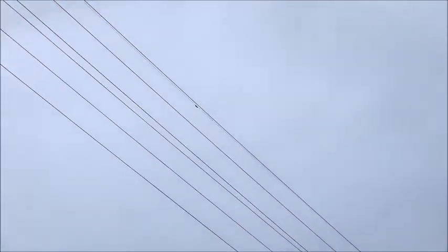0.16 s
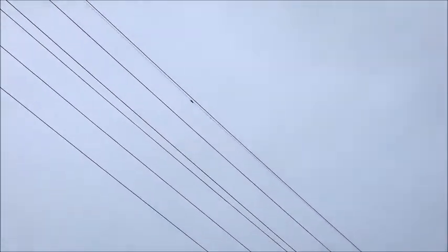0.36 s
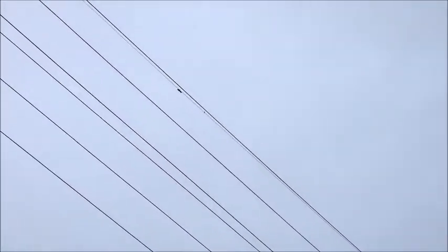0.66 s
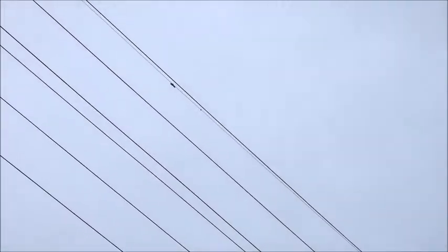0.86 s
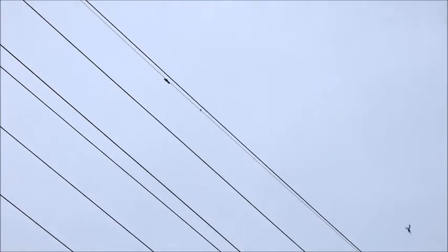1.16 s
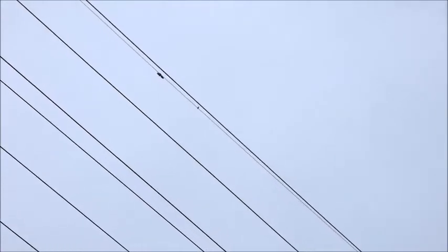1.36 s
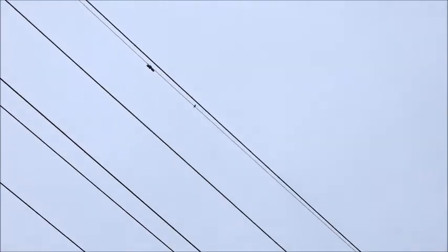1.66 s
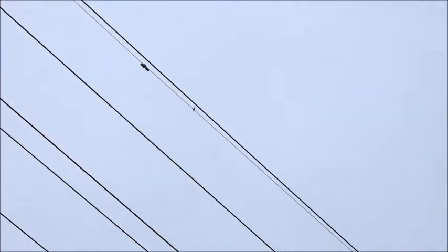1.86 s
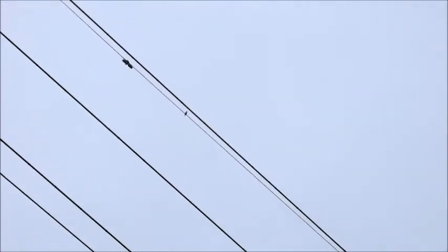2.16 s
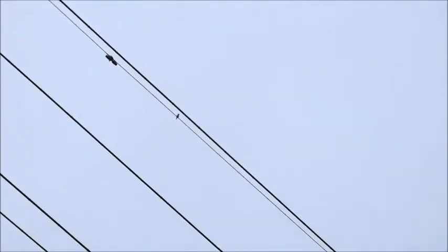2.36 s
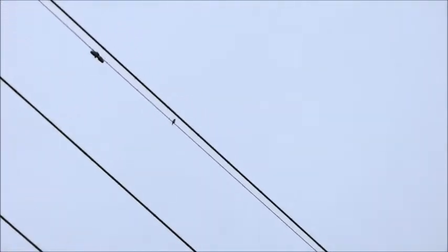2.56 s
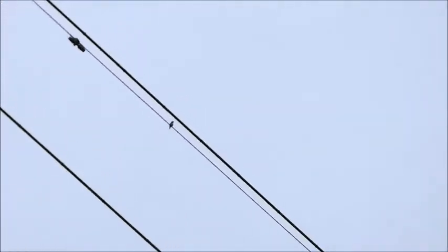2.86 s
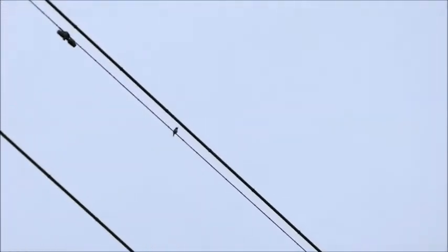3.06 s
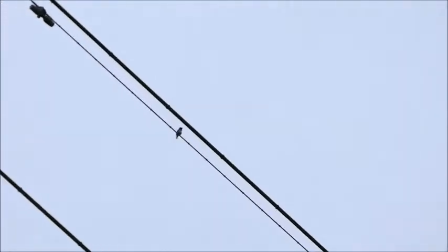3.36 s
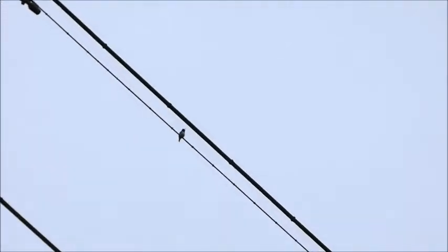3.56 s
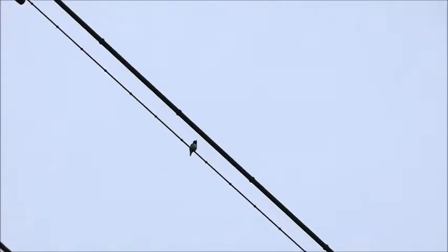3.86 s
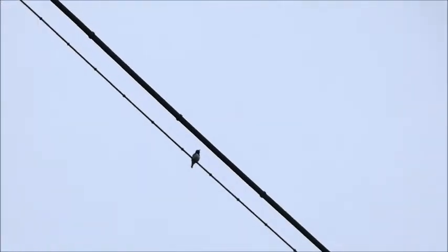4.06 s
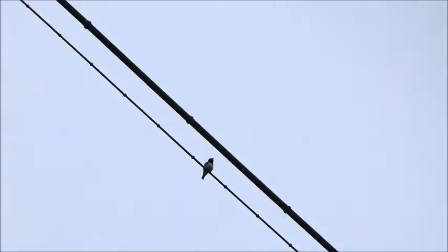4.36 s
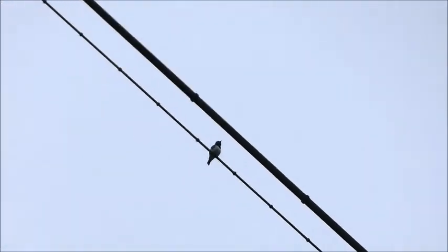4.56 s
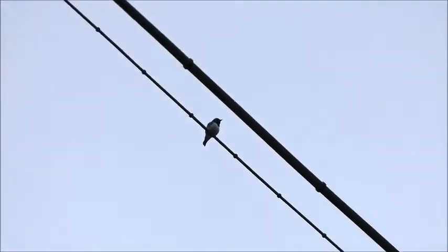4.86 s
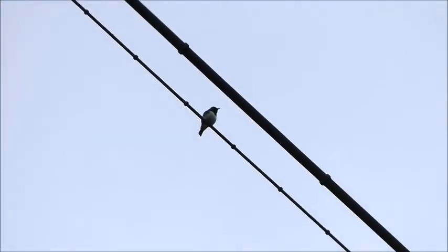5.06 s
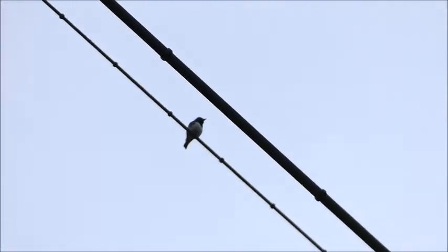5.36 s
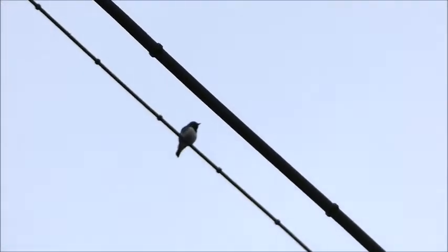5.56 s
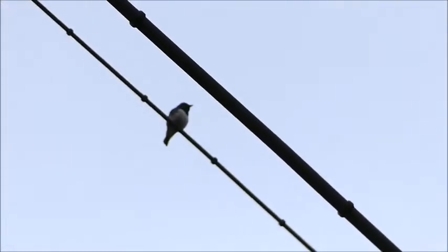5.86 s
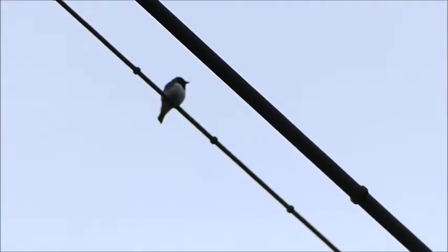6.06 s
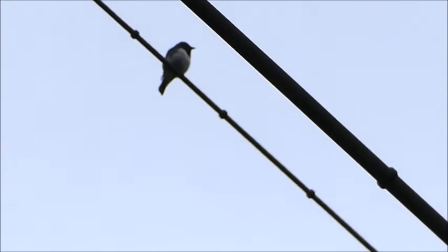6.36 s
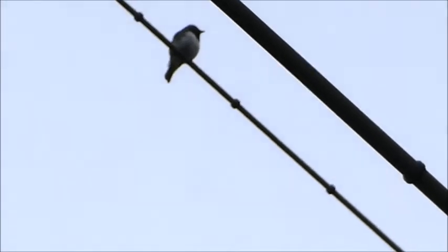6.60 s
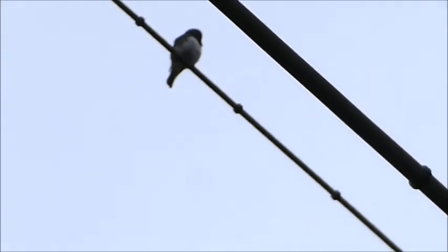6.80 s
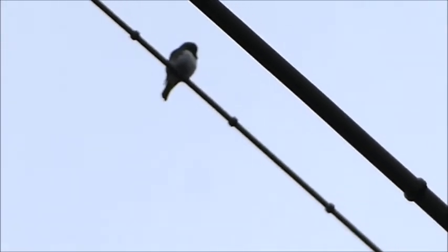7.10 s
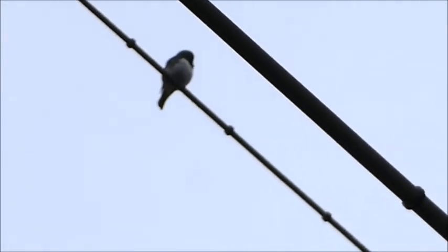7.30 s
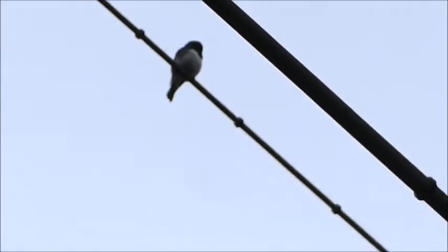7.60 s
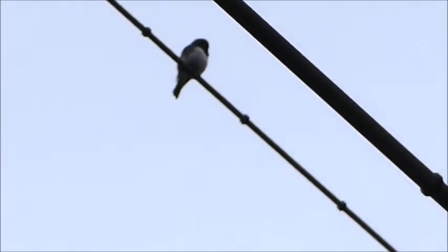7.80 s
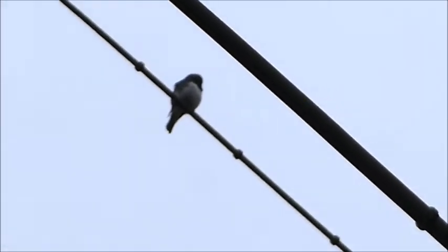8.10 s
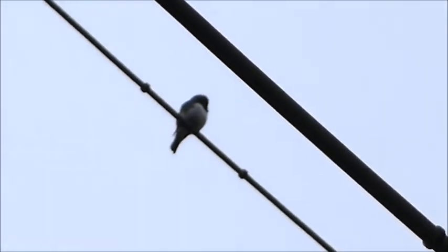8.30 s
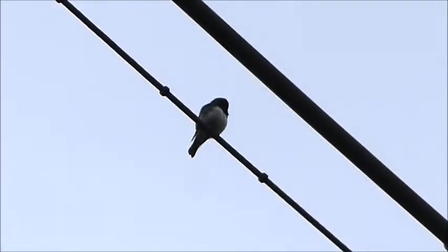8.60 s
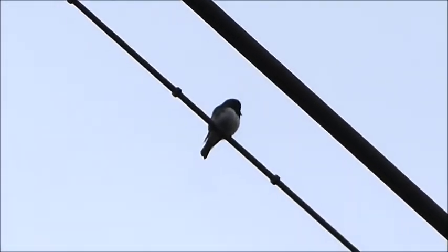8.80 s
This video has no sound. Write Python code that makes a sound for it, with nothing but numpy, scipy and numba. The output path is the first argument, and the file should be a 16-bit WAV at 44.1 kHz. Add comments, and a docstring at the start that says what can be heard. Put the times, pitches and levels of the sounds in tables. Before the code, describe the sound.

A songbird whistles gliding notes over an outdoor wash of leaves and water, then the background shifts and a second bird flutes before a sharp click.

```python
"""Among trees and slopes songbirds whistle, as gliding near sines whose notes echo on in fading noise tails.
A wash of leaves, water and far birds is shaped noise whose stereo image closes towards the centre; a quick
crossfade at 5.4 s brings in a second, nearly mono outdoor wash, which then swells slowly. Water gurgles as
rising bubble rings, dry ticks are noise bursts, and a button on a camera body rings its plastic modes as
contacts strike; a gain control ducks after loud peaks."""
import sys
import numpy as np
from scipy import signal
from scipy.fft import rfft, irfft, next_fast_len
from scipy.io import wavfile
from scipy.ndimage import uniform_filter1d
from numba import njit

SR = 44100
rng = np.random.default_rng(int(sys.argv[2]) if len(sys.argv) > 2 else 0)


def log_audio(samples):
    """Write samples as a 16-bit WAV file to the path given in sys.argv[1]."""
    # one column per channel
    frames = np.atleast_2d(samples).T
    # limit to full scale, then quantise
    limited = np.clip(frames, -1, 1)
    pcm = np.round(limited * 32767).astype(np.int16)
    wavfile.write(sys.argv[1], SR, pcm)


def ratio_of_db(decibels):
    """Turn decibels (scalar or array-like) into linear amplitude factors; 0 dB maps to 1."""
    return 10 ** (np.asarray(decibels, float) / 20)


N = 394254
T = np.arange(N) / SR


def colour(points):
    """Spectral shaping: white noise is weighted by (hz, relative density in dB) points and set to rms 1."""
    hz, db = np.transpose(points)
    size = next_fast_len(N)
    f = np.arange(size // 2 + 1) * SR / size + 1
    spectrum = rfft(rng.standard_normal(size))
    weight = ratio_of_db(np.interp(np.log(f), np.log(hz), db))
    x = irfft(spectrum * weight, size)[:N]
    return x / x.std()


def walk(rate_hz):
    """Band-limited fluctuation: random levels are held 1 / rate_hz and slewed twice, spread near 1."""
    k = int(SR / rate_hz)
    held_levels = np.repeat(rng.standard_normal(N // k + 1), k)
    return 1.3 * uniform_filter1d(uniform_filter1d(held_levels, k), k)[:N]


def cut(x, hz, kind):
    """Steep filtering: an eighth-order Butterworth low- or high-pass."""
    return signal.sosfilt(signal.butter(8, hz, kind, fs=SR, output="sos"), x)


def band_pass(x, low_hz, high_hz, order):
    """Band limiting: a Butterworth band-pass keeps the range between two edges."""
    return signal.sosfilt(signal.butter(order, [low_hz, high_hz], "band", fs=SR, output="sos"), x)


def add(out, start_s, sound):
    """Superposition: a short sound is summed into the whole."""
    i = int(start_s * SR)
    out[i:i + len(sound)] += sound[:len(out) - i]


# levels of the first wash's two colours and of the side: start_s, open_wash_db, closing_wash_db, stereo_width_db
WASH_LEVELS = [(0, -50.5, -69, -3), (1, -51.5, -62, -4), (2.2, -50.5, -57, -6.5), (3.3, -52, -56, -10.5),
               (4.2, -55.5, -51.5, -18), (4.8, -58, -53, -23), (5.36, -63.5, -53.5, -50),
               (5.45, -84, -56.5, -37), (6.5, -94, -98, -43)]


def wash_levels():
    """Level interpolation: one colour of wash gives way to another while the side signal shrinks."""
    s, *columns = np.transpose(WASH_LEVELS)
    return [np.interp(T, s, column) for column in columns]


# side density relative to mid density: frequency_hz, level_db
WASH_SIDE_TILT = [(60, 0), (200, -12), (400, 13.5), (700, 0.5), (1300, 0.5), (2400, -9.5), (4000, -20)]


def wash(points, db, gust_db):
    """Diffuse field: mid and side are unrelated shaped noises; the mid treble rustles in small gusts."""
    hz, density_db = np.transpose(points)
    side_hz, side_db = np.transpose(WASH_SIDE_TILT)
    side_points = np.c_[hz, density_db + np.interp(np.log(hz), np.log(side_hz), side_db)]
    mid = colour(points)
    high = cut(mid, 3050, "high")
    # the top treble follows the gusts only in part
    top = cut(mid, 7636, "high") * ratio_of_db(0.5 * gust_db + 1.1 * walk(13))
    mid = cut(mid, 2740, "low") + cut(high, 8364, "low") * ratio_of_db(gust_db) + top
    return ratio_of_db(db) * np.array([mid, ratio_of_db(-0.5) * colour(side_points)])


# opening spectrum of leaves, water and far birds: frequency_hz, relative_density_db
OPEN_SPECTRUM = [(35, -31), (60, -24), (200, -6), (300, -4.5), (560, -8.5), (682, -11), (1220, -13.5),
                 (1600, -7), (2300, -2), (3000, -8), (3760, -16.5), (5330, -13.5), (8120, -14.5),
                 (10300, -18.5), (14200, -31), (16000, -72)]


def open_wash(open_db, gust_db):
    """Spectral colouring: the outdoor wash as it sounds while the stereo image is wide."""
    return wash(OPEN_SPECTRUM, open_db, gust_db)


# spectrum that comes forward as the stereo image closes: frequency_hz, relative_density_db
CLOSING_SPECTRUM = [(35, -52), (60, -32), (189, 3.5), (262, -20), (553, -4), (715, -19), (1010, -1),
                    (1200, -94), (2190, -43), (2900, -9), (5460, -5.5), (7750, -4), (11500, -9),
                    (16000, -24.5)]


def closing_wash(closing_db, gust_db):
    """Spectral colouring: a second colour of the wash grows as the stereo image closes."""
    return wash(CLOSING_SPECTRUM, closing_db, gust_db)


def chorus(bands, flicker_db):
    """Narrow-band noise: each (hz, width_hz, level_db) band flickers on its own."""
    out = 0
    for hz, width_hz, db in bands:
        band = band_pass(rng.standard_normal(N), hz - width_hz / 2, hz + width_hz / 2, order=3)
        out = out + ratio_of_db(db + flicker_db * walk(12)) * band / band.std()
    return out


# far insects or frogs:
# pitch_hz, width_hz, level_db (re the open wash, before the stereo width takes its part)
FAR_CHORUS_BANDS = [(1008, 92, -11), (1775, 83, -6.5), (2650, 45, -5.5)]


def far_chorus(open_db, width_db):
    """Many-voice masking: a far chorus blends into noise bands that sink with the open wash."""
    voices = chorus(FAR_CHORUS_BANDS, flicker_db=2.5)
    return ratio_of_db(open_db + 0.13 * width_db) * voices * np.array([[1], [0.4]])  # mid, side


# insects that come forward as the image closes: pitch_hz, width_hz, level_db (re the closing wash)
INSECT_BANDS = [(5410, 640, -4.5)]


def insects(closing_db):
    """Many-voice masking: a high band of noise follows the closing wash."""
    return ratio_of_db(closing_db) * chorus(INSECT_BANDS, flicker_db=2.7)


def knocks():
    """Damped oscillation: dull irregular bumps of a few cycles, as of slopping water."""
    out, t = np.zeros(N), T[:int(0.06 * SR)]
    envelope = t / 0.0054 * np.exp(1 - t / 0.0057)
    for when, size, pitch in rng.random((160, 3)):
        tone = np.sin(2 * np.pi * 190 * 3.3 ** pitch * t)
        add(out, when * N / SR, ratio_of_db(-6 + 7.2 * size) * tone * envelope)
    return cut(out, 132, "high")


def rustles():
    """Modulated noise: faint puffs of top treble swell and die at random moments."""
    start = np.zeros(N)
    when, size = rng.random((140, 2)).T
    start[(when * N).astype(int)] = ratio_of_db(-59 + 6.0 * size)
    t = T[:int(0.1 * SR)] / 0.0074  # in rise times of 7.4 ms
    envelope = signal.oaconvolve(start, t * np.exp(1 - t))[:N]
    return band_pass(envelope * rng.standard_normal(N), 8300, 11800, order=2)


def phrase(*kinds):
    """Similarity of form: each row stretches the shape of its kind into (s, Hz, dB) points, with a burr."""
    notes, burr = [], []
    for shape, rows in kinds:
        share, place, rel_db = np.transpose(shape)
        for s, length_s, first_hz, second_hz, db, rough in rows:
            pitch_hz = first_hz + place * (second_hz - first_hz)
            notes.append(np.c_[s + share * length_s, pitch_hz, db + rel_db])
            burr.append(rough)
    return notes, burr


def bird(notes, burr):
    """Frequency modulation: a near sine glides through its points; unsteady phase and level give a burr."""
    out, shake, flutter = np.zeros(N), walk(260), walk(140)
    for note, rough in zip(notes, burr):
        s, hz, db = np.transpose(note)
        k = np.arange(max(int((s[0] - 0.004) * SR), 0), min(int((s[-1] + 0.0019) * SR), N))
        t = T[k]
        glide_hz = uniform_filter1d(np.interp(t, s, hz), size=150)
        phase = 2 * np.pi * np.cumsum(glide_hz) / SR
        level = ratio_of_db(np.interp(t, s, db) + 5.55 * rough * flutter[k])
        fade = np.clip(np.minimum(t - t[0], t[-1] - t) / 0.00099, 0, 1)
        out[k] += np.sin(phase + rough * shake[k]) * np.sqrt(2) * level * fade
    return out


def echoes(slopes, t60_s, top_hz):
    """Reverberation: a fading noise tail of many returns from trunks, with clumps from nearer slopes."""
    t = T[:int(1.2 * SR)]
    shape = 10 ** (-3 * t / t60_s) * np.clip(t / 0.0075, 0, 1)
    for s, db in slopes:
        shape = shape + ratio_of_db(db) * np.exp(-((t - s) / 0.013) ** 2)
    # gaps between trunks make the tail patchy
    shape = shape * ratio_of_db(1.3 * walk(42)[:len(t)])
    tail = shape * rng.standard_normal((2, len(t)))
    return cut(tail, top_hz, "low") / np.sqrt(np.sum(shape ** 2))


def heard(song, tail, straight_db, echo_db, pan):
    """Direct and diffuse sound: the straight path is panned (1 left); moving air reshuffles the echoes."""
    one, two = signal.oaconvolve(song[None], tail, axes=1)[:, :N] * ratio_of_db(echo_db)
    turn = 1.44 * walk(32)  # radians
    mid = one * np.cos(turn) + two * np.sin(turn)
    side = two * np.cos(turn) - one * np.sin(turn)
    straight = ratio_of_db(straight_db) * song
    return np.array([straight + mid, pan * straight + ratio_of_db(-13.5) * side])


# clumps of stronger echo round the whistler and the far birds: delay_s, level_db (re the tail's start)
GROVE_SLOPES = [(.025, 8.5), (.06, 2.5), (.12, -8)]


def grove_echoes():
    """Absorption: leaves swallow the highest part of the returning sound."""
    return echoes(GROVE_SLOPES, t60_s=0.96, top_hz=4260)


# note shapes: share_of_length, place (0 first pitch, 1 second pitch), level_db (re the note)
SWOOP_SHAPE = [(0, 0.6, -28), (.25, 0.01, -0.5), (.38, 0, 0.5), (.52, 0.6, -6.5), (.66, .92, -2),
               (.82, 0.95, -2), (1, 0.91, -31)]
CLIMB_SHAPE = [(0, 0.0057, -7), (.16, .22, -4), (.3, .6, -3), (.62, .7, -1), (.78, 1, 0), (1, 1, -7.5)]
DROP_SHAPE = [(0, 0.092, -40), (.27, .68, -13), (.6, .94, -11.5), (.8, 1, 1.5), (1, 1, -4.5)]
LIFT_SHAPE = [(0, 0.0099, -5.5), (.35, 0.86, 0), (.65, 1, -4), (1, 1, -16.5)]
RAMP_SHAPE = [(0, 0, -21), (.42, .5, -7), (.58, .71, -6), (.75, .7, 0), (.92, .86, -15), (1, 0.96, -13)]
SCOOP_SHAPE = [(0, 0, -14), (.35, 0.23, -7), (.65, .35, -5), (.9, .9, 2), (1, 0.91, -2)]
CREST_SHAPE = [(0, 0, -22), (.38, 0.98, -2), (.66, 1, -0.5), (1, 0.85, -31)]
SLIDE_SHAPE = [(0, 0.065, -10), (.35, 0.388, -9), (.72, .95, -1.5), (1, 1, -21)]
STAIR_SHAPE = [(0, 0, -4), (.1, 0.01, -11), (.22, .28, -4), (.38, 0.6, -1), (.62, .75, 0), (.85, .92, 1),
               (1, 1, -1)]
# the whistler's notes, one table a shape:
# start_s, length_s, first_pitch_hz, second_pitch_hz, level_db (before shape and mix), burr (0 pure)
SWOOP_NOTES = [(-.065, 0.17, 3244, 2592, -37.5, 0.29), (0.155, 0.26, 3280, 2590, -40, 0.1),
               (0.465, .27, 3220, 2546, -39, 0.58)]
CLIMB_NOTES = [(2.2, .29, 2028, 3060, -41.5, 0.77), (3.041, .28, 1864, 2970, -38.5, 0.7)]
DROP_NOTES = [(1.63, 0.094, 3670, 3080, -29, 0.29), (2.03, 0.07, 3400, 3044, -44, 0.29),
              (2.501, 0.11, 3660, 3125, -24, .05), ]
LIFT_NOTES = [(1.81, 0.092, 2220, 2400, -47.5, 0.92), (1.94, 0.1, 2130, 2380, -45.5, 0.97),
              (2.69, 0.119, 2180, 2465, -42.5, 0.75), (2.83, 0.14, 2087, 2305, -41, 0.7),
              (3.55, 0.166, 2160, 2366, -43, 0.81), (3.73, 0.16, 2100, 2264, -40, 0.68)]
RAMP_NOTES = [(1.333, .24, 1848, 3140, -35.5, 0.98)]
SCOOP_NOTES = [(1.04, .17, 2020, 2650, -44, 0.92)]
CREST_NOTES = [(0.753, 0.2, 2726, 3163, -33, 0.41)]
SLIDE_NOTES = [(3.39, .115, 3424, 3098, -25.5, 0.54)]
STAIR_NOTES = [(3.95, .285, 1816, 3060, -45, 1)]


def whistler():
    """Whistled tones: a bird right of centre sings gliding notes, heard straight and by echo."""
    song = bird(*phrase((SWOOP_SHAPE, SWOOP_NOTES), (CLIMB_SHAPE, CLIMB_NOTES), (DROP_SHAPE, DROP_NOTES),
                        (LIFT_SHAPE, LIFT_NOTES), (RAMP_SHAPE, RAMP_NOTES), (SCOOP_SHAPE, SCOOP_NOTES),
                        (CREST_SHAPE, CREST_NOTES), (SLIDE_SHAPE, SLIDE_NOTES), (STAIR_SHAPE, STAIR_NOTES)))
    return heard(song, grove_echoes(), straight_db=-1.4, echo_db=-1.5, pan=-0.5)


# the clearer bubbles: start_s, level_db, starting_pitch_hz
GURGLE_BUBBLES = [(.05, -49, 190), (.1, -47, 562), (0.115, -42.5, 190), (.244, -42.5, 256),
                  (.325, -51, 210), (0.625, -48.5, 342), (1.098, -53.5, 318), (1.739, -44.5, 387),
                  (3.257, -48, 395), (3.325, -47.5, 329), (4.327, -47, 408), (7.811, -48, 400),
                  (7.915, -55, 428), (7.962, -57, 413), (8.027, -52, 768), (8.651, -53.5, 406),
                  (8.797, -51, 402)]


def gurgles():
    """Bubble resonance: short soft rings climb a little, with a weak octave; small ones come at random."""
    out, t = np.zeros(N), T[:int(0.09 * SR)]
    when, size, pitch = rng.random((70, 3)).T
    small = np.c_[when * N / SR, -66 + 8 * size, 350 * 1.35 ** pitch]
    envelope = t / 0.0062 * np.exp(1 - t / 0.0076)
    for s, db, hz in np.r_[GURGLE_BUBBLES, small]:
        phase = 2 * np.pi * hz * t * (1 + 0.33 * t)
        add(out, s, ratio_of_db(db) * (np.sin(phase) + 0.17 * np.sin(2 * phase)) * envelope)
    return out


# dry insect ticks: start_s, level_db (before the band filter)
INSECT_TICKS = [(1.1775, -34.5), (3.7878, -33), (3.845, -31), (4.055, -32.5), (4.118, -32), (4.181, -33),
                (4.247, -31.5)]


def ticks():
    """Transient noise: brief bursts decay exponentially within a high band."""
    out, t = np.zeros(N), T[:int(0.03 * SR)]
    for s, db in INSECT_TICKS:
        add(out, s, ratio_of_db(db) * rng.standard_normal(len(t)) * np.exp(-t / 0.0072))
    return band_pass(out, 5000, 6900, order=4)


# a far bird's long trill: start_s, pitch_hz (middle of the swing), level_db (at the beads, before the mix)
TRILL_LINE = [(2.5, 3860, -34), (2.575, 3590, -36.5), (3.0, 3435, -35), (3.4, 3247, -39.5),
              (3.66, 3202, -32.5), (3.8, 3206, -47), (3.95, 3180, -63)]


def trill():
    """Joint modulation: a sinking line is pinched between even beads, and each bead droops a little."""
    bead_s, first_bead_s, gap_db, fall_hz = 0.0935, 2.53, -30, 60
    s, hz, db = np.transpose(TRILL_LINE)
    t = np.arange(s[0], s[-1], 1 / 200)
    beat = 2 * np.pi * (t - first_bead_s) / bead_s
    pitch_hz = np.interp(t, s, hz) - fall_hz * np.sin(beat) / 2
    level_db = np.interp(t, s, db) + gap_db * np.sin(beat / 2) ** 2
    return np.c_[t, pitch_hz, level_db]


# far notes in the lift shape:
# start_s, length_s, first_pitch_hz, second_pitch_hz, level_db (before shape and mix), burr (0 pure)
FAR_NOTES = [(2.141, 0.21, 3700, 3950, -39.5, 0.31), (2.381, 0.11, 3950, 3660, -43, .9),
             (2.37, .14, 3930, 3870, -44, .6), (2.481, 0.12, 4700, 4724, -42.5, .4),
             (2.62, 0.08, 4720, 4700, -46, .3), (7.88, 0.076, 3040, 2935, -52, 0.5),
             (8.0, 0.118, 2340, 2430, -52, 0.5), (8.255, .2, 2720, 2870, -48, .5),
             (8.22, 0.197, 2300, 2420, -57, .5), (7.74, 0.096, 2700, 2760, -52.5, .5),
             (8.445, 0.2, 2360, 2410, -53, .5), (8.58, 0.093, 2750, 2850, -52, 0.5),
             (8.715, 0.108, 2690, 2890, -47.5, 0.5), (8.89, .06, 2330, 2380, -52, .4),
             (8.86, .1, 2880, 2870, -51, 0.4)]


def far_birds():
    """Direct-to-echo ratio: far glides and a trill arrive near the centre with their echoes."""
    song = bird(*phrase((LIFT_SHAPE, FAR_NOTES))) + bird([trill()], [0.26])
    return heard(song, grove_echoes(), straight_db=-1.7, echo_db=-2.3, pan=-0.027)


# spectrum of the second, nearly mono wash: frequency_hz, relative_density_db
SECOND_SPECTRUM = [(35, -64), (60, -30), (149, -17.5), (294, -24), (389, -12.5), (540, -9.5), (651, -25.5),
                   (767, -5), (1110, -10), (1640, -8.5), (2500, -2), (4320, -1), (7570, -8), (10300, -8),
                   (14600, -28.5), (16000, -34)]
# bands that ring and flicker in it: pitch_hz, width_hz, level_db (re the second wash)
RINGING_BANDS = [(404, 70, -24), (775, 55, -24), (950, 70, -24), (1400, 90, -19), (1880, 140, -18)]


def second_wash(gust_db):
    """Crossfade: a second, nearly mono outdoor wash fades in quickly at 5.4 s, then swells slowly."""
    start_s, rise_s, level_db, swell_db_per_s = 5.39, 0.032, -48.5, 0.5
    since = T - start_s
    rise = 1 - np.exp(-np.sqrt(np.maximum(since, 0) / rise_s))
    second_db = level_db + swell_db_per_s * since + 20 * np.log10(np.clip(rise, 1e-3, 1))
    air = wash(SECOND_SPECTRUM, second_db, gust_db)
    air[0] += ratio_of_db(second_db) * chorus(RINGING_BANDS, flicker_db=3.5)
    return air


# clumps of stronger echo round the fluter: delay_s, level_db (re the tail's start)
GLADE_SLOPES = [(0.008, 7), (.05, -2.5), (.095, -7)]


def glade_echoes():
    """Reverberation: the fluter's echoes fade slowly and keep more treble."""
    return echoes(GLADE_SLOPES, t60_s=1.94, top_hz=7000)


# shapes of held tones: share_of_length, place (0 first pitch, 1 second pitch), level_db (re the note)
SWELL_SHAPE = [(0, 0.023, -23), (.25, 0.252, -9.5), (.85, 0.96, -3), (.94, 1, -0.5), (1, 0.43, -8)]
HOLD_SHAPE = [(0, 0.15, -23), (.06, 0, -17.5), (.4, 0.49, -9), (.78, 1, -4.5), (.9, .95, 2), (.97, 0.55, 4),
              (1, 0.6, -5)]
# held tones: start_s, length_s, first_pitch_hz, second_pitch_hz, level_db (before shape and mix), burr
SWELL_NOTES = [(5.52, 0.685, 1730, 1775, -45.5, .1)]
HOLD_NOTES = [(5.67, 0.936, 1524, 1489, -40, 0.18)]


def held_tones(glade):
    """Sustained tones: the fluter's long notes overlap and grow, with weaker echoes."""
    song = bird(*phrase((SWELL_SHAPE, SWELL_NOTES), (HOLD_SHAPE, HOLD_NOTES)))
    return heard(song, glade, straight_db=-0.54, echo_db=-7, pan=0)


# the fluter's own shapes: share_of_length, place (0 first pitch, 1 second pitch), level_db (re the note)
ARCH_SHAPE = [(0, 0.03, -16), (.27, 0.2, -10), (.5, .5, -7), (.6, .82, -3), (.67, 1, 1), (.76, .84, -6),
              (.87, .35, -12), (1, 0, -19)]
PLUNGE_SHAPE = [(0, 0.03, -5), (.13, 0, -1), (.28, .25, -7), (.5, .58, 2), (.72, .82, -5), (1, 0.96, -4)]
HUMP_SHAPE = [(0, 0.03, -5), (.5, 1, 0), (.72, .6, -5), (1, -.3, -12)]
WARBLE_SHAPE = [(0, .7, -20), (.1, .1, -6), (.36, 0, 2), (.5, .5, -12), (.6, .9, -11), (.7, .17, -1),
                (1, .1, -3)]
# the fluter's quick notes, one table a shape:
# start_s, length_s, first_pitch_hz, second_pitch_hz, level_db (before shape and mix), burr (0 pure)
ARCH_NOTES = [(6.62, 0.061, 1800, 3160, -30, 0.7), (7.055, 0.1, 1120, 2900, -28.5, 0.6)]
PLUNGE_NOTES = [(6.472, .066, 5000, 1500, -36.5, 0.9), (7.5, 0.0215, 3110, 2100, -42, 0.7),
                (6.77, .022, 3170, 2380, -41, .5), (6.926, .021, 3500, 1950, -33, 0.6),
                (6.65, 0.0255, 1700, 1244, -39, 0.4)]
FLUTER_LIFT_NOTES = [(6.675, 0.079, 1281, 1627, -35, 0.31), (6.95, 0.056, 1973, 2080, -33, 0.51),
                     (6.262, .055, 1820, 2030, -38, .5)]
HUMP_NOTES = [(6.8, 0.026, 2436, 2700, -23, 0.25)]
WARBLE_NOTES = [(6.9, 0.05, 3660, 4400, -33, 1.5)]
FLUTER_SWOOP_NOTES = [(6.357, .05, 3240, 2470, -35.5, 0.7)]


def fluter(glade):
    """Rapid frequency sweeps: short steep glides ring on in a long echo."""
    song = bird(*phrase((ARCH_SHAPE, ARCH_NOTES), (PLUNGE_SHAPE, PLUNGE_NOTES),
                        (LIFT_SHAPE, FLUTER_LIFT_NOTES), (HUMP_SHAPE, HUMP_NOTES),
                        (WARBLE_SHAPE, WARBLE_NOTES), (SWOOP_SHAPE, FLUTER_SWOOP_NOTES)))
    return heard(song, glade, straight_db=-1.6, echo_db=-0.88, pan=0)


# contacts as the button is pressed and let go: start_s, level_db (peak before the filters), contact_ms
BUTTON_CONTACTS = [(7.5098, -22.5, 0.027), (7.5112, -20, 0.15), (7.515, -18, 0.039), (7.5167, -19, 0.13),
                   (7.531, -32, 0.44), (7.5948, -27, 0.36), (7.5982, -6.5, 0.041), (7.609, -26, 0.33),
                   (7.613, -23, 0.18)]
# modes of the plastic body: pitch_hz, level_db (before a small random change), t60_s
BODY_MODES = [(865, -18.5, 0.092), (1460, -10.5, 0.021), (2160, 1, 0.02), (3360, -8.5, 0.019),
              (4140, 1.5, 0.0077), (5440, 5, 0.0052), (6500, -4, 0.013), (9960, 2, 0.0045)]


def button():
    """Modal impact: each contact cracks and rings the plastic body; longer contacts are duller."""
    out, t = np.zeros(N), T[:int(0.06 * SR)]
    for s, db, contact_ms in BUTTON_CONTACTS:
        chance = rng.standard_normal(len(t))
        hit = 0.57 * chance * np.exp(-t / 0.0028)
        for (hz, mode_db, t60_s), c, d in zip(BODY_MODES, chance, chance[::-1]):
            hit = hit + ratio_of_db(mode_db + 0.82 * c - 60 * t / t60_s) * np.sin(2 * np.pi * hz * t + 3 * d)
        hit = np.convolve(hit, np.exp(-t[:64] * 1000 / contact_ms))[:len(t)]
        add(out, s, ratio_of_db(db) * hit / np.abs(hit).max())
    # so small a body radiates no bass, and the case dulls the top
    return cut(cut(out, 880, "high"), 14200, "low")


def capsule_difference(air, press):
    """Decorrelation: two capsules differ in the treble and a little in the bass throughout."""
    # the same noise a moment later is unrelated but keeps colour and gusts
    other = np.roll(air, 300) + np.roll(press, 3)
    treble = ratio_of_db(-4.5) * cut(other, 9360, "high")
    bass = ratio_of_db(-19) * cut(np.roll(air, 2000), 670, "low")
    return treble + bass


def scene():
    """Mid-side stereophony: all sources are summed in mid and side, and the side of birds and air shrinks."""
    open_db, closing_db, width_db = wash_levels()
    gust_db = 0.27 * walk(12) + 1.56 * walk(45)
    air = open_wash(open_db, gust_db) + closing_wash(closing_db, gust_db) + second_wash(gust_db)
    air = air + far_chorus(open_db, width_db)
    air[0] += insects(closing_db) + rustles() + ratio_of_db(open_db) * knocks()
    glade = glade_echoes()
    birds = whistler() + far_birds() + held_tones(glade) + fluter(glade)
    press = button()
    mid = birds[0] + air[0] + gurgles() + ticks() + press
    side = (birds[1] + air[1]) * ratio_of_db(width_db) + capsule_difference(air[0], press)
    return np.array([mid + side, mid - side])


@njit
def follow(x, release):
    """Peak detection: the level jumps up at once and sinks exponentially."""
    y, e = np.empty(len(x)), 1e-9
    for i in range(len(x)):
        e = max(x[i], e * release)
        y[i] = e
    return y


def top_cut(x):
    """Nothing passes above the cut-off."""
    return signal.sosfilt(signal.butter(12, 16460, fs=SR, output="sos"), x)


def record(dry):
    """Dynamic compression: the gain control ducks after loud peaks and recovers."""
    limit_db, release_s, ratio = -14, 0.16, 4.1
    peak = follow(np.abs(dry).max(axis=0), np.exp(-1 / (release_s * SR)))
    gain = np.minimum(ratio_of_db(limit_db) / peak, 1) ** (1 - 1 / ratio)
    # the gain answers about 16 ms late, so the blow itself passes
    gain = np.roll(uniform_filter1d(gain, size=200), 700)
    return top_cut(dry * gain)


dry = scene()
out = record(dry)
log_audio(out)
```